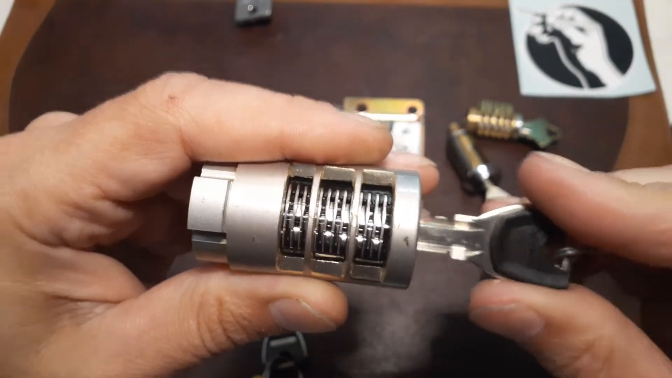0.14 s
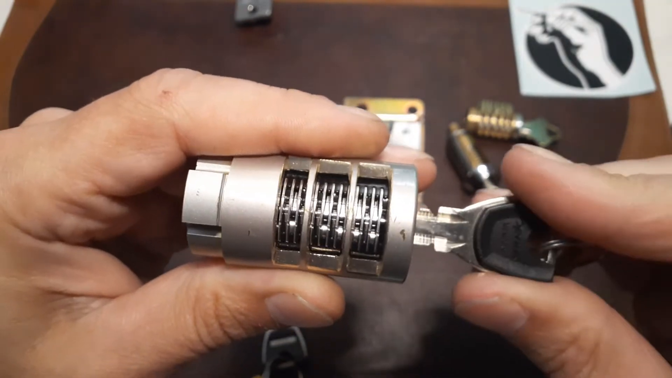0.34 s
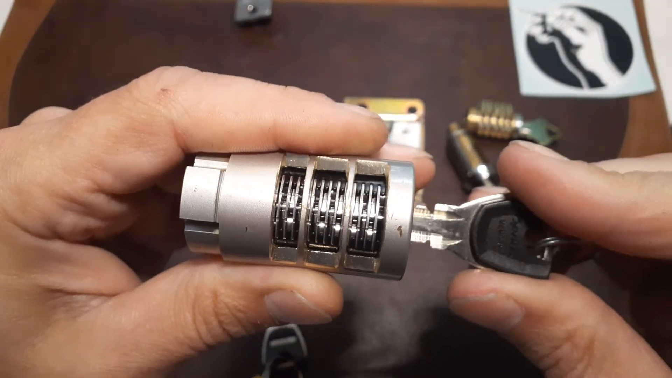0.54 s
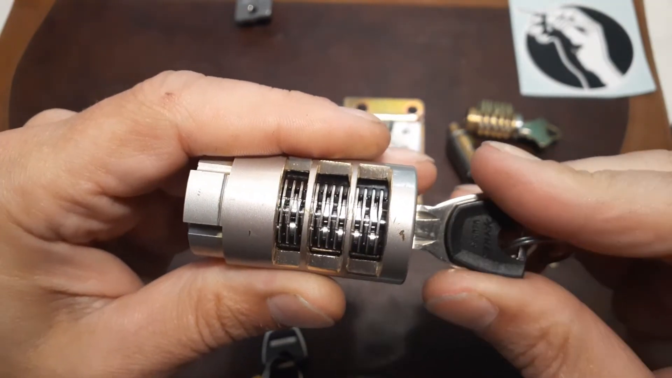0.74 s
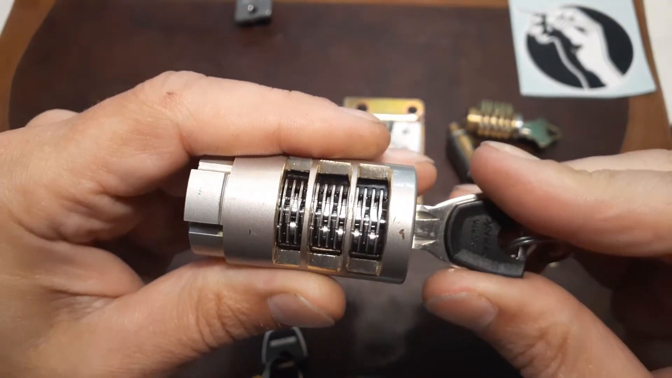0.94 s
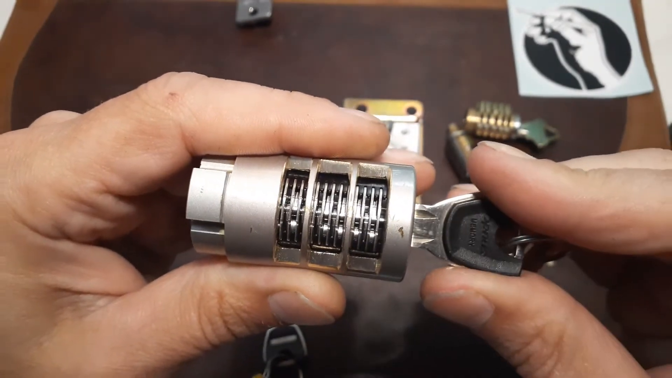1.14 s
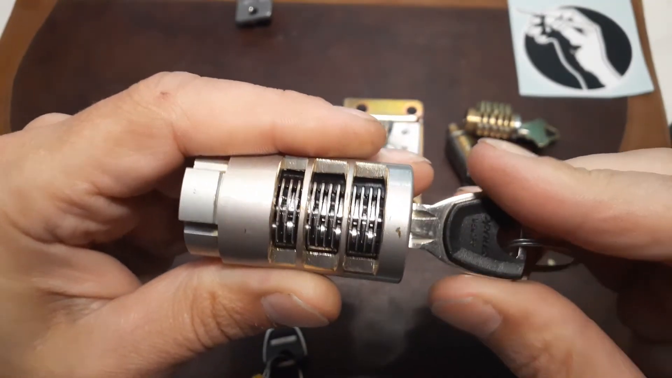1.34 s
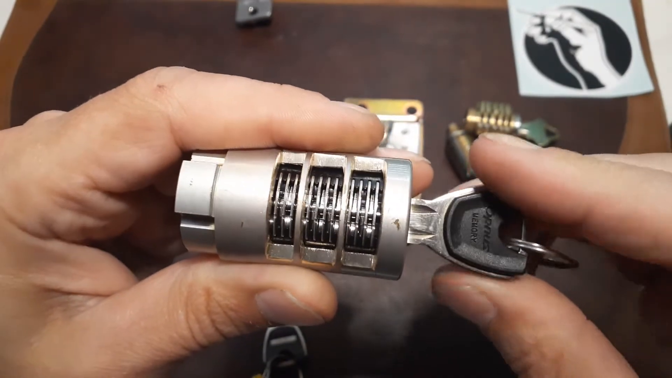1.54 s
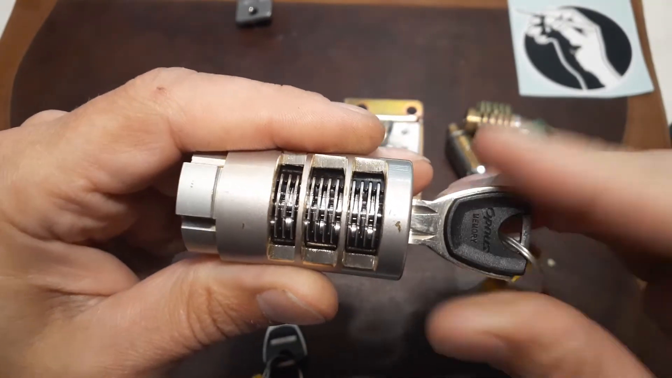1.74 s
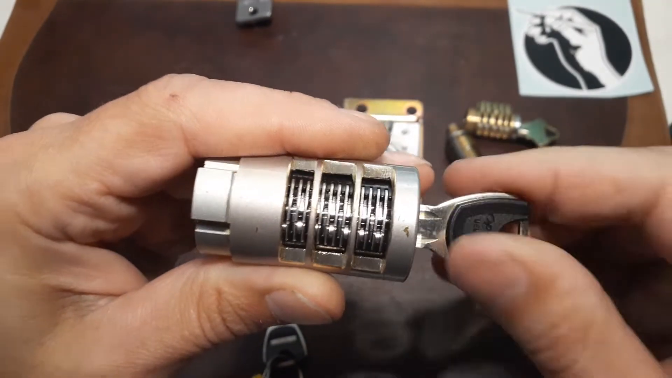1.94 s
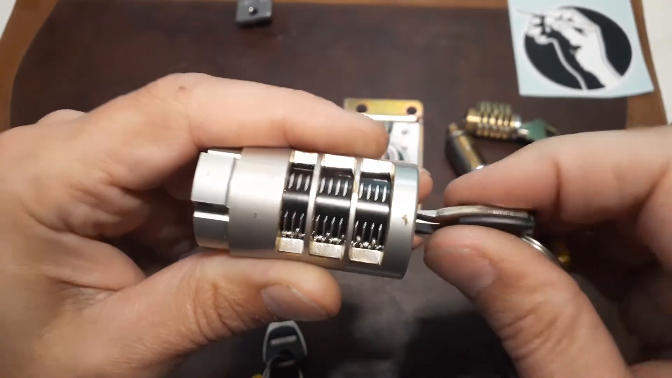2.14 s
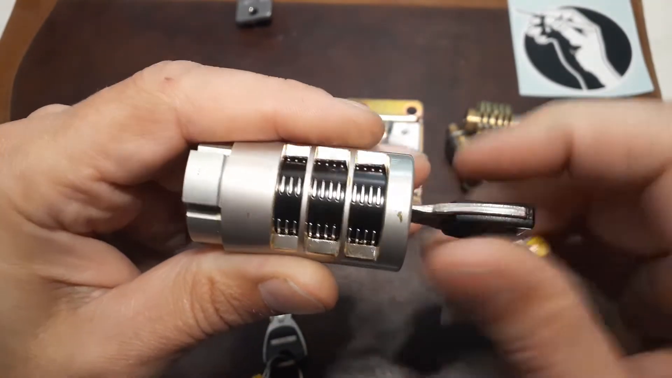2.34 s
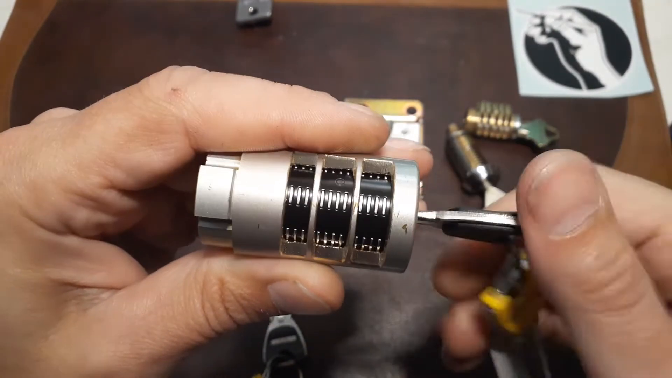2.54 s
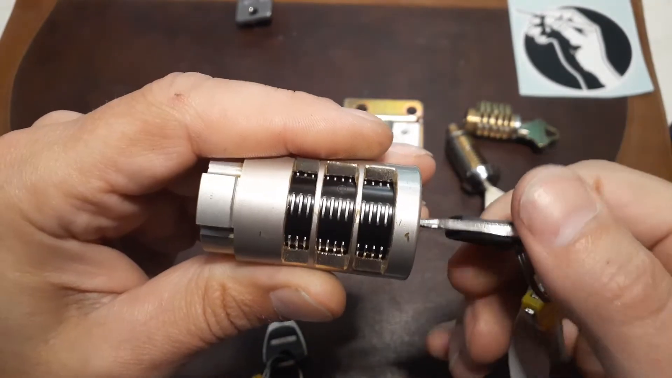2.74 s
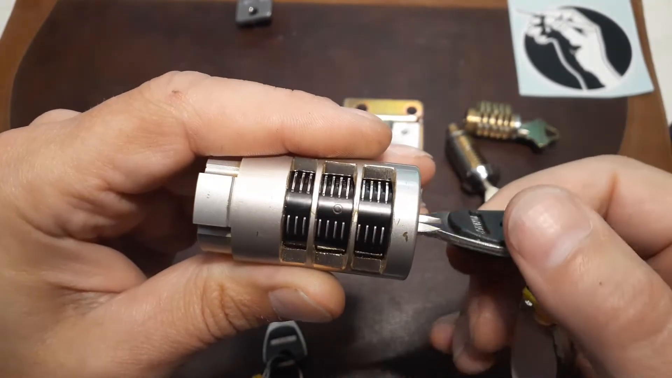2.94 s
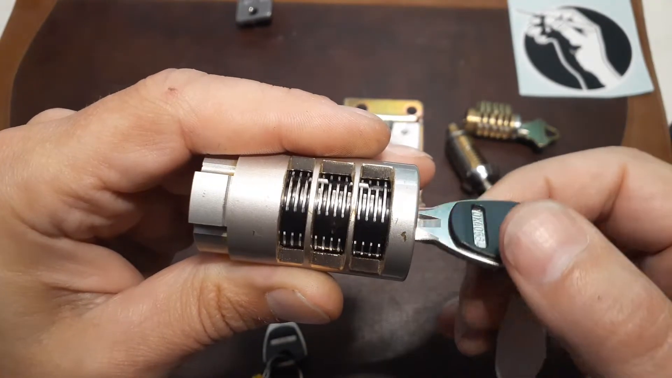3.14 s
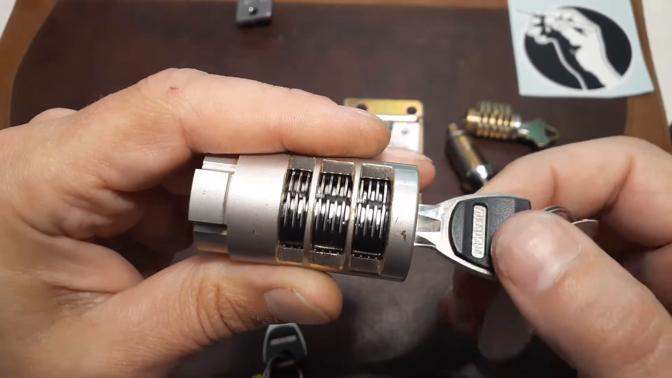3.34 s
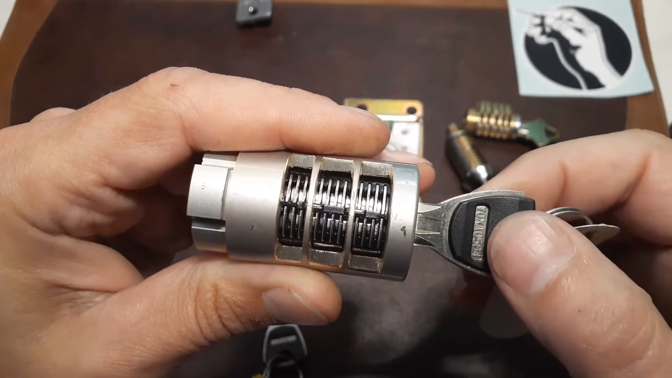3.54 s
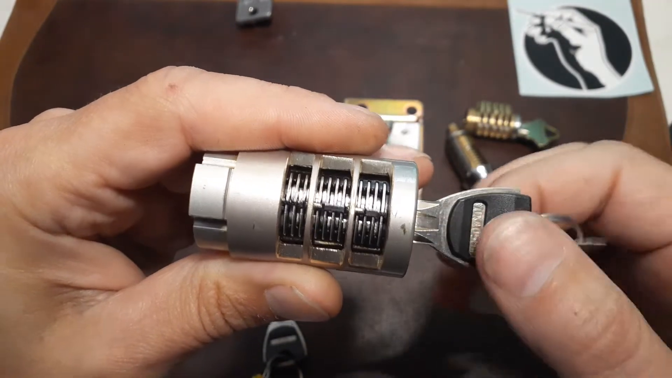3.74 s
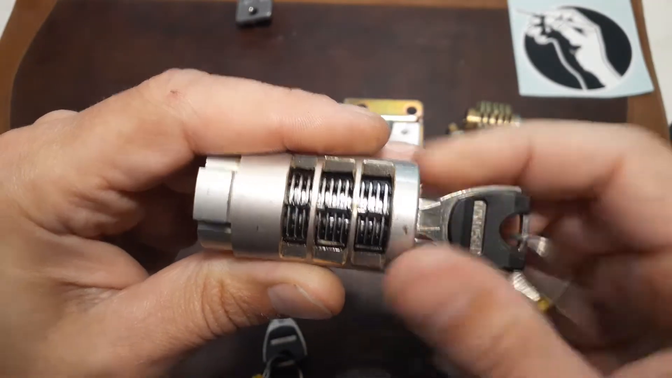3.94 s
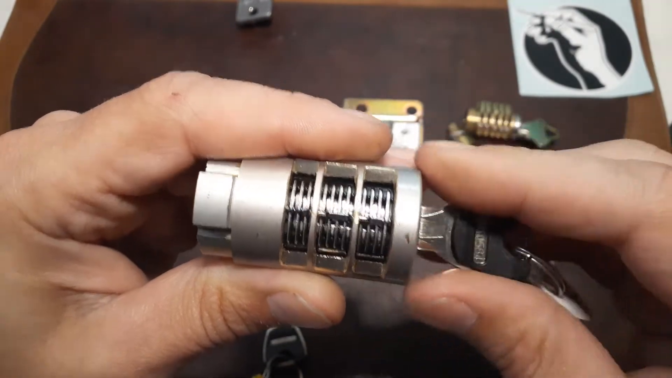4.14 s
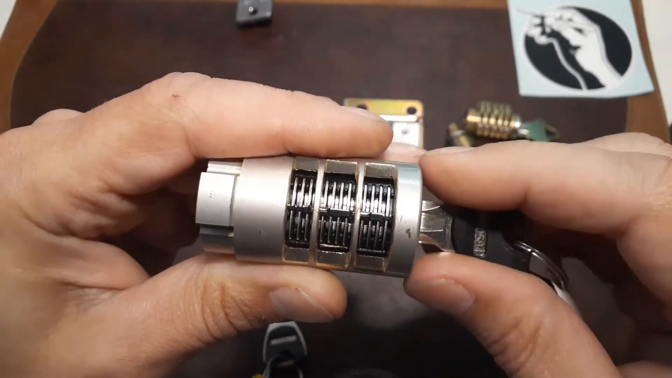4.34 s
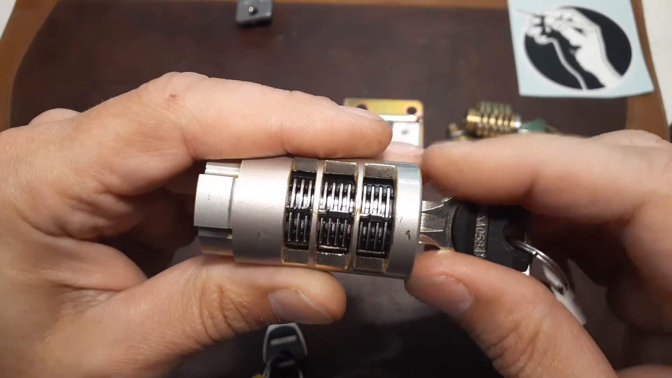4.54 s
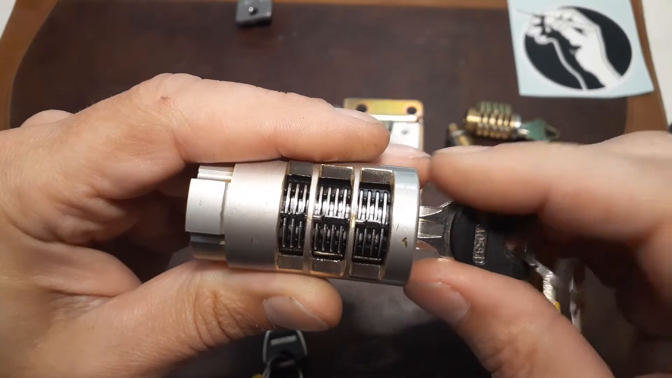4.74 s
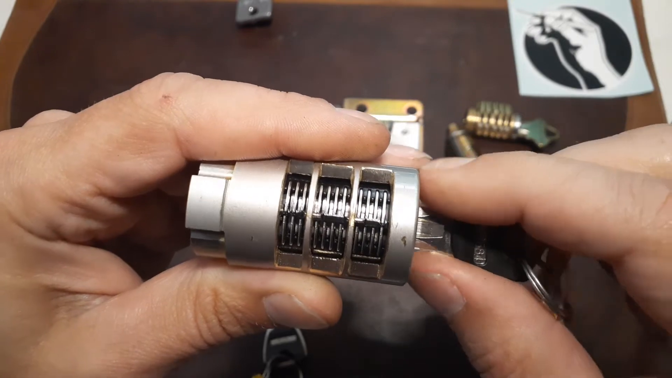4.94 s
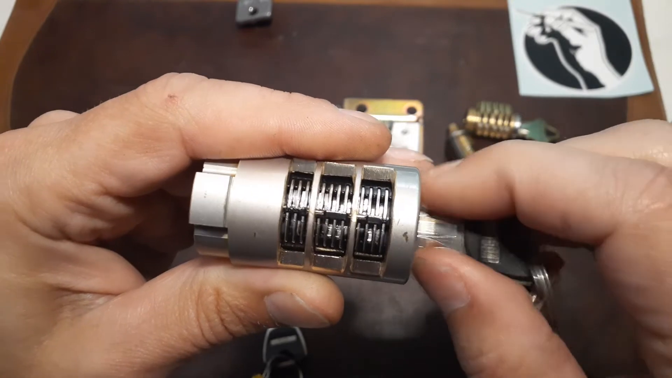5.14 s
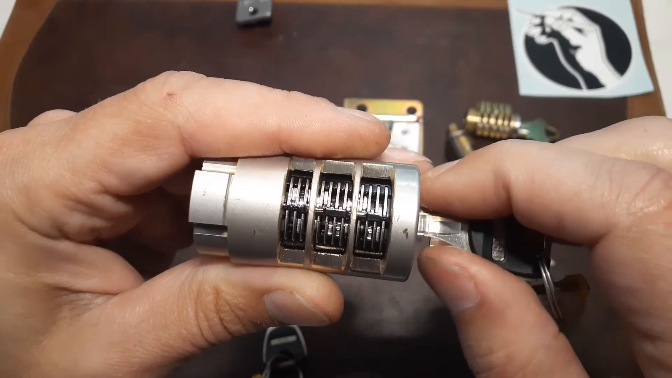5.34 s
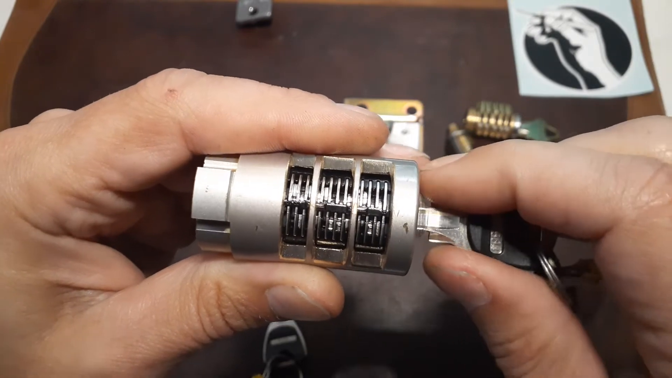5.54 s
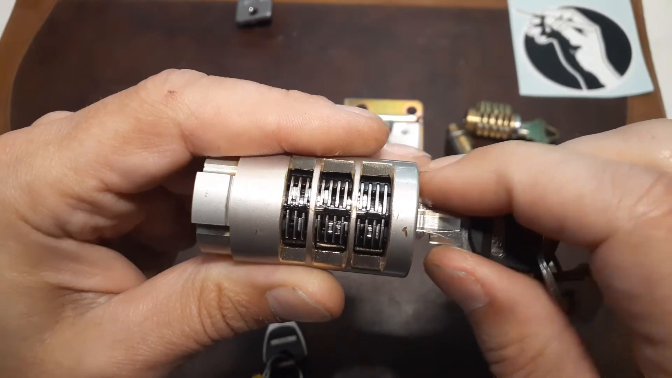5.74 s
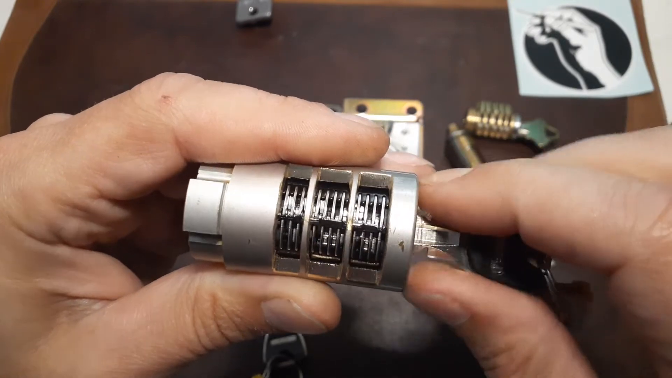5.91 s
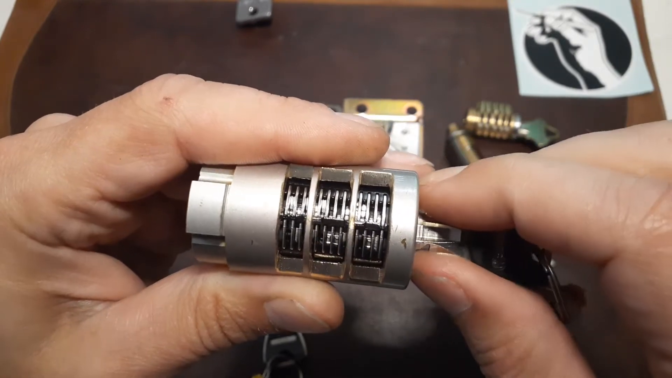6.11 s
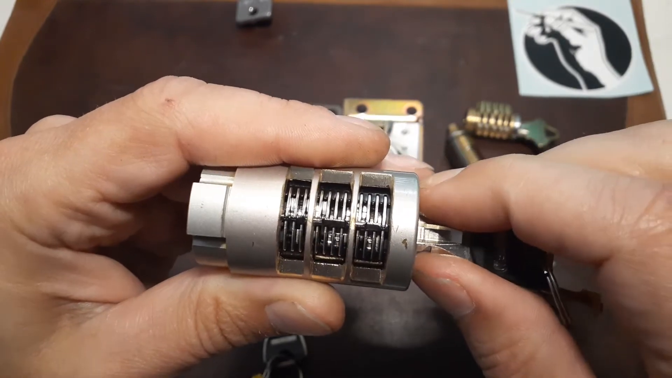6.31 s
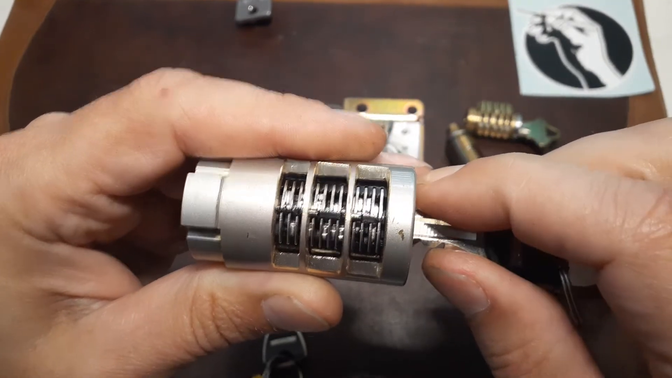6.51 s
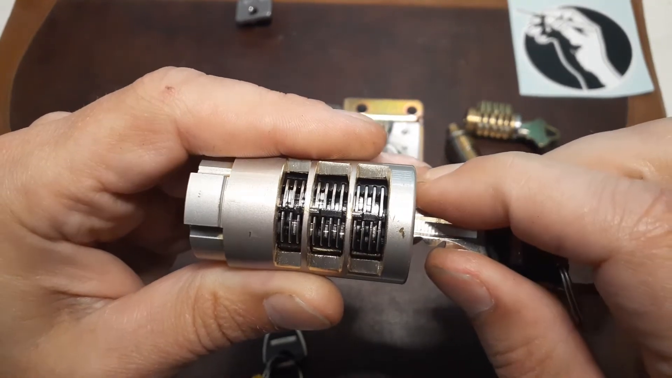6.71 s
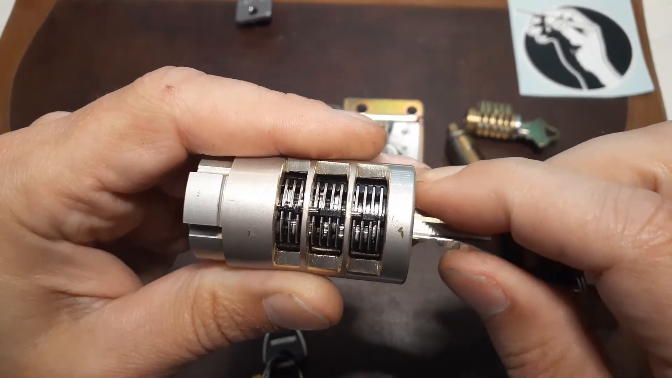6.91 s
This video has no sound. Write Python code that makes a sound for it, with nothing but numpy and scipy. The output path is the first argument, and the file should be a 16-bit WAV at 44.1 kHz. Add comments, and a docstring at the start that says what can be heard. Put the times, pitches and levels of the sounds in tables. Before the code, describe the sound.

Close up in a small room, tiny spring-loaded parts snap and tick as a key slides into a metal lock. Fingers rub faintly on the key as it turns, with a few dull hand bumps and one sharp, ringing click. Short clusters of crisp clicks, with pauses between them, come as the key is eased partway back. The lock sits slightly to the left, and a fan hums softly throughout.

```python
"""A fan hums in a small room as a key on a ring is pushed into a hand-held lock cylinder.
Spring-loaded wafers grind over its cuts and snap against the housing; now and then an impact leaves
a small steel part in free vibration. The key is then turned, while fingers rub on it with stick-slip
friction and the hands bump close by on the left. Last, it is worked part of the way back out."""
import sys
import numpy as np
from scipy import signal
from scipy.fft import rfft, irfft
from scipy.io import wavfile

SR = 44100
rng = np.random.default_rng(int(sys.argv[2]) if len(sys.argv) > 2 else 0)


def dump_mix(stems):
    """Bounce the given channels to the path in sys.argv[1] as a 16-bit WAV at rate SR."""
    frames = np.atleast_2d(stems).T  # one column per channel
    limited = np.clip(frames, -1, 1)  # hard clip at full scale
    pcm = np.round(limited * 32767).astype(np.int16)
    wavfile.write(sys.argv[1], SR, pcm)


N = 307377
TIME = np.arange(N) / SR
CUTOFF_HZ = 16000


def contacts(body_t60=0.038, likeness=0.44, spread_db=1.5, count=300):
    """Modal superposition: each metal contact scrapes in, snaps, and excites the modes of the lock."""
    # metal contacts: (time [s], treble level [dB], body emphasis [dB], slip time before landing [s])
    impacts = [(0.1155, -28.5, -4.5, 0.0021), (0.1329, -36, 0, 0.00064), (0.146, -37, -9, .001),
               (0.153, -20.5, -8, .0006), (0.1595, -40, 3, .001), (.168, -29.5, -2, 0.00049),
               (0.1857, -42, -11, .0005), (0.2116, -26, -4.5, 0.00096), (0.232, -47, 7, 0.00046),
               (0.6107, -49, -5.5, .0004), (0.6225, -26, -8.5, .0016), (0.6322, -30.5, -2, .0005),
               (0.65, -50, 8, .0005), (0.66, -22.5, -4, 0.0051), (0.665, -32.5, -3.5, .0006),
               (1.3106, -76.5, -10.5, 0.00043), (1.3237, -61.5, -7.5, 0.00091),
               (1.6514, -65.5, -6.5, .0005), (1.8207, -61, -0.5, 0.0011), (1.8363, -65.5, -2, .001),
               (1.916, -76, 12, .001), (1.931, -67.5, 8.5, .0008), (2.0274, -37.5, -10.5, 0.0012),
               (2.034, -35, -5.5, .002), (2.076, -55, -6, .002), (2.0886, -41, -20, 0.0008),
               (2.095, -43, 0, 0.0024), (2.773, -67, 13, .003), (2.783, -50, 5.5, .0002),
               (3.433, -37.5, -14, .001), (3.4362, -21, -10.5, 0.00011), (3.4415, -33, -7, .001),
               (3.9893, -65, 13, .0004), (4.047, -67, 0, .0005), (4.081, -77, 19, .001),
               (4.0898, -50.5, 0.5, 0.0011), (4.1464, -62, -11, .001), (4.821, -67.5, 2, .002),
               (4.986, -52.5, -3, .0004), (5.1138, -62, 2, .002), (5.1487, -43.5, -9.5, .0002),
               (5.173, -26.5, -10, .003), (5.179, -39, -2, 0.0012), (5.3378, -66.5, 0.5, 0.0032),
               (5.358, -68, 2, .003), (6.4987, -45.5, -9.5, 0.0013), (6.5133, -23.5, -14, .003),
               (6.8178, -33.5, -12, 0.0021), (6.8233, -25.5, -10, .0003)]
    # spectral envelope of a contact: (frequency [Hz], level [dB])
    lock_colour = [(60, -20), (250, -14.5), (600, -17), (1250, -21.5), (1900, -1), (3100, 3.5), (4300, 2),
                   (5300, -2.5), (6300, -2), (7700, 1), (8600, 8), (10500, 3), (13500, 7.5), (15700, 4)]
    # distinct resonances of key and housing: (frequency [Hz], level [dB], t60 [s])
    lock_modes = [(2280, 3, 0.055), (2700, -2.5, 0.017), (3320, -1.5, 0.096), (3630, 2, 0.05),
                  (4280, -1, 0.0093), (8450, -2, 0.065), (8270, -3, 0.048), (12800, -3.5, 0.047),
                  (13500, 0, 0.067), (14000, 0.5, .06)]
    rise_s, snap_s, half_snap_slip_s = .0003, .001, .00035
    scrape_db, snap_db = -9.5, 14
    crowd_hz = np.linspace(80, CUTOFF_HZ, count) + rng.uniform(-25, 25, count)
    crowd = np.column_stack([crowd_hz, np.zeros(count), np.full(count, body_t60)])
    hz, mode_db, t60 = np.vstack([crowd, lock_modes]).T
    lead, attack = round(.012 * SR), round(.0035 * SR)
    t = TIME[:SR // 8] - lead / SR
    before, after = np.minimum(t, 0), np.maximum(t, 0)
    modes = from_db(-60 * after / t60[:, None]) * np.exp(2j * np.pi * hz[:, None] * t)
    modes = np.vstack([modes.real, modes.imag])
    body_band = at_hz([(600, 0), (1500, 1), (5500, 1), (8000, 0)], hz)
    bright_band = at_hz([(5500, 0), (8000, 1), (10500, 1), (11500, 0)], hz)
    treble = signal.butter(4, 11000, "high", fs=SR, output="sos")
    out = np.zeros((2, N))
    for time_s, level_db, body_db, slip_s in impacts:
        # every touch lands elsewhere, so it excites the modes with different signs
        shared, own = rng.choice([-1, 1], len(modes)), rng.choice([-1, 1], (2, len(modes)))
        excitation = np.sqrt(likeness) * shared + np.sqrt(1 - likeness) * own
        # lighter and fuller contacts ring lower: more near 9 kHz relative to the top treble
        bright_db = -2.5 + .23 * (-24 - level_db) + .22 * body_db
        colour_db = at_hz(lock_colour, hz) + mode_db + bright_band * bright_db + body_band * body_db
        gains = from_db(colour_db + spread_db * rng.standard_normal(len(hz)))
        ringing = (excitation * np.tile(gains, 2)) @ modes
        # friction builds as the part slips; the shorter the slip, the harder the snap
        scrape = from_db(scrape_db) * np.exp(before / slip_s)
        snap = from_db(snap_db) / (1 + (slip_s / half_snap_slip_s) ** 2)
        onset = .5 * (1 + np.tanh(t / rise_s))
        strike = onset * (1 + snap * np.exp(-(t / snap_s) ** 2))
        hit = ringing * (scrape + strike)
        treble_rms = signal.sosfilt(treble, hit[:, lead:lead + attack]).std()
        add(out, time_s + t[0], from_db(level_db) * hit / treble_rms)
    return out


def pings(pan_db=7.5):
    """Free vibration: a lightly damped steel part rings on as a sum of decaying sinusoids."""
    # parts left ringing by a snap: (time [s], part, level [dB])
    struck_parts = [(.153, "spring", -58), (.2115, "spring", -59), (0.661, "spring", -55.5),
                    (0.662, "housing", -53.5), (1.323, "key", -70.5), (2.095, "key", -49.5),
                    (2.785, "housing", -57.5), (2.784, "wafer", -57), (3.4361, "key ring", -41),
                    (4.822, "wafer", -71), (4.986, "wafer", -71), (5.15, "wafer", -66),
                    (5.173, "wafer", -54), (6.514, "housing", -61.5), (6.822, "key", -58.5)]
    # natural modes of each part: (frequency [Hz], level [dB], t60 [s])
    part_modes = {"spring": [(7122, 1.5, 0.46), (7335, -3.5, 0.31)], "key ring": [(4380, -1, 0.36),
                  (2060, -3, .041), (2950, -4, 0.035), (8420, 12, .035)], "key": [(2015, 2, .06),
                  (2280, -4.5, 0.049), (2695, -6.5, 0.031), (4180, -9.5, 0.084)],
                  "wafer": [(2260, -3, 0.074), (3470, -1.5, 0.07), (4000, -5.5, .07)],
                  "housing": [(560, 0, .04), (800, -1.5, 0.013), (1020, 1.5, .041), (1280, -0.5, 0.031),
                  (1572, 5, .04)]}
    out, t = np.zeros((2, N)), TIME[:SR]
    for time_s, part, level_db in struck_parts:
        ring = sum(from_db(db - 60 * t / t60) * np.sin(2 * np.pi * hz * t)
                   for hz, db, t60 in part_modes[part])
        add(out, time_s, panned(pan_db) * from_db(level_db) * ring)
    return out


def rubbing(grain_db=3.5, uneven_db=4.5, width_hz=650.0):
    """Stick-slip friction: skin and metal catch and let go; each stroke excites one key resonance."""
    # strokes of fingers and key:
    # (time [s], length [s], level [dB], body emphasis [dB], resonance [Hz], resonance level [dB])
    strokes = [(1.967, 0.013, -57, -3.5, 9050, -15), (2, .17, -64.5, 2.5, 11800, -12),
               (2.376, .07, -70, -2.5, 9120, -13.5), (2.522, 0.18, -79, -2, 8800, -5.5),
               (2.707, .02, -72.5, 5.5, 7460, 5), (2.745, 0.065, -71.5, 13, 8560, -6),
               (2.904, 0.022, -71, 5.5, 4060, -21), (3.649, 0.034, -68, 10.5, 7300, -12.5),
               (3.887, .055, -85, -10.5, 6550, 1.5), (3.851, 0.16, -83, -20, 8900, 2),
               (3.977, 0.17, -74.5, 12, 11200, -9), (5.88, 0.054, -78, 7, 9500, -7)]
    # friction spectrum: (frequency [Hz], spectral density [dB])
    rub_colour = [(900, -12.5), (1600, -1), (2300, 3.5), (3200, -10), (4200, -1.5), (5300, -9), (7400, 2),
                  (8700, 6), (10500, 2.5), (13000, 3), (15500, 1)]
    catches_per_s, catch_db, catch_decay_s = 40, 3.5, .0032
    out, t = np.zeros((2, N)), TIME[:SR // 2] - .1
    hz = np.fft.rfftfreq(len(t), 1 / SR)
    body_band = at_hz([(4500, 1), (7000, 0)], hz)
    friction = rms_one(from_db(at_hz(rub_colour, hz)))
    impulses = rng.random(N) < catches_per_s / SR
    catches = signal.lfilter([1], [1, -np.exp(-1 / (catch_decay_s * SR))], impulses + 1e-18)
    roughness = from_db(grain_db * drift(460) + uneven_db * drift(44))
    grip = roughness * (1 + from_db(catch_db) * catches)
    grains = rms_one(rng.standard_normal((2, N)) * grip)
    for time_s, length_s, level_db, body_db, peak_hz, peak_db in strokes:
        start = round((time_s + t[0]) * SR)
        resonance = rms_one(np.abs(1 / (1 + 2j * (hz - peak_hz) / width_hz)) ** 2)
        colour = friction * from_db(body_db * body_band) + from_db(peak_db) * resonance
        stroke = grains[:, start:start + len(t)] * swell(t, length_s, rise_s=.014, fall_s=.03)
        add(out, time_s + t[0], from_db(level_db) * irfft(rfft(stroke) * colour, len(t)))
    return out


def bumps(pan_db=52.0, gain_db=-0.5, rumble_db=-15):
    """Heavy damping: a bump of the hands dies in a few cycles, in a longer rumble of shifting skin."""
    # soft impacts: (time [s], level [dB], frequency [Hz])
    thuds = [(1.544, -33.5, 90), (1.656, -48, 55), (4.011, -35, 100), (4.167, -35, 110), (6.882, -62, 50)]
    # spectrum of shifting skin: (frequency [Hz], spectral density [dB])
    skin_colour = [(20, -34), (55, 1.5), (100, -3), (170, -2), (300, -36.5), (700, -74)]
    out, rumble = np.zeros(N), from_db(rumble_db) * coloured(rng.standard_normal(N), skin_colour)
    for time_s, level_db, hz in thuds:
        t = TIME - time_s
        thud = swell(t, 0, rise_s=.0034, fall_s=.012) * np.sin(2 * np.pi * hz * t)
        out += from_db(level_db) * (thud + rumble * swell(t, 0, rise_s=.027, fall_s=.043))
    return from_db(gain_db) * panned(pan_db) * out


def placed(x, lag_s=.00018):
    """Time and level differences: the lock is heard first on the left, and louder, most in the treble."""
    # level difference: (frequency [Hz], left minus right [dB])
    balance = [(500, 3), (2500, 2.5), (8000, 4), (13000, 7)]
    hz = np.fft.rfftfreq(N, 1 / SR)
    gains = from_db(at_hz(balance, hz) * np.array([[.5], [-.5]]))
    delay = np.exp(-2j * np.pi * hz * lag_s * np.array([[0], [1]]))
    return irfft(rfft(x) * delay * gains / np.sqrt(np.mean(gains ** 2, axis=0)), N)


def room(x, wet_db=-16.0, desk_db=-14.0, desk_t60=0.018, bass_db_per_decade=7.5, bands=9):
    """Reverberation: early reflections from hands and desk, then a short tail; both favour the lows."""
    # reverberation time: (frequency [Hz], t60 [s])
    room_t60 = [(200, 0.31), (2000, 0.16), (8000, 0.11), (13000, 0.15)]
    t = TIME[:SR // 2]
    edges = np.geomspace(150, 17000, bands + 1)
    white, response = rng.standard_normal((bands, 2, len(t))), 0
    for noise, low, high in zip(white, edges, edges[1:]):
        hz = np.sqrt(low * high)
        tail = rms_one(from_db(-60 * t / at_hz(room_t60, hz)) * (t > .008))
        early = rms_one(from_db(-60 * t / desk_t60) * (t > .003))
        decay = np.hypot(from_db(wet_db) * tail, from_db(desk_db) * early) / np.sqrt(len(t))
        band = signal.sosfilt(signal.butter(2, [low, high], "band", fs=SR, output="sos"), noise * decay)
        response = response + band * from_db(bass_db_per_decade * np.log10(edges[-1] / hz))
    return signal.fftconvolve(x, response, axes=1)[:, :N]


def fan(air_db=-64.5, air_pan_db=1.5, wander_rad=0.25, lag_s=.00045):
    """Broadband and tonal noise: dull rushing air and a wavering hum reach the right side first."""
    # spectrum of fan and room air: (frequency [Hz], spectral density [dB])
    air_colour = [(18, -73), (30, -35), (90, -21.5), (112, -24), (221, -14.5), (259, -9.5), (280, -9.5),
                  (526, -17.5), (780, -21), (844, -25), (1130, -33), (2290, -37.5), (6900, -51),
                  (14800, -39), (16000, -44.5)]
    # coherence of the air noise: (frequency [Hz], left-right correlation)
    air_coherence = [(40, .2), (130, 0.84), (260, 1), (500, 0), (1000, 0.61), (15000, 0.24)]
    # slow wavering of the rush: (time [s], level [dB])
    air_swell = [(0, 2), (.5, -1.5), (.9, -2.5), (1.7, -1.5), (2.3, 0.5), (4.6, 0.5), (6.97, 0)]
    # tones of the fan: (frequency [Hz], rms level [dB])
    tones = [(119.5, -79.5), (258, -65), (515.5, -72), (839.5, -77), (2320, -92.5), (9001, -103)]
    alike = at_hz(air_coherence, np.fft.rfftfreq(N, 1 / SR))
    mid, side = rfft(rng.standard_normal((2, N)))
    air = irfft(np.sqrt(1 + alike) * mid + np.sqrt(1 - alike) * side * [[1], [-1]], N)
    hum = sum(from_db(db) * np.sqrt(2) * np.sin(2 * np.pi * hz * TIME + wander_rad * drift(16))
              for hz, db in tones)
    air_gain = from_db(air_db + np.interp(TIME, *np.transpose(air_swell)))
    left, right = air_gain * panned(air_pan_db) * coloured(air, air_colour) + hum
    return np.array([np.interp(TIME - lag_s, TIME, left), right])


def whine(hz=14686, level_db=-90):
    """Phase modulation: a thin electronic tone wanders slightly, alike in both channels."""
    return from_db(level_db) * np.sqrt(2) * np.sin(2 * np.pi * hz * TIME + drift(25))


def from_db(db):
    """Decibels to amplitude ratio."""
    return 10 ** (np.asarray(db) / 20)


def rms_one(x):
    """Normalisation to unit rms."""
    return x / np.sqrt(np.mean(x ** 2) + 1e-20)


def at_hz(points, hz):
    """Interpolation of a table on a log-frequency axis."""
    table = np.array(points)
    return np.interp(np.log(np.maximum(hz, 1)), np.log(table[:, 0]), table[:, 1])


def panned(pan_db):
    """Constant-power panning: left and right gains, pan_db apart."""
    return rms_one(from_db([[pan_db / 2], [-pan_db / 2]]))


def add(out, start_s, sound):
    """Superposition: mix a sound in at its moment."""
    i = max(round(start_s * SR), 0)
    out[:, i:i + sound.shape[-1]] += sound[..., :N - i]


def drift(per_s):
    """Random modulation: straight lines between Gaussian values."""
    knots = rng.standard_normal(4000)
    return np.interp(TIME * per_s, np.arange(len(knots)), knots)


def coloured(x, spectrum):
    """Spectral shaping of a steady noise, at unit rms."""
    hz = np.fft.rfftfreq(N, 1 / SR)
    return rms_one(irfft(rfft(x) * from_db(at_hz(spectrum, hz)), N))


def swell(t, length_s, rise_s, fall_s):
    """Exponential envelope: grows up to time 0, holds, and decays."""
    return np.exp(np.minimum(t, 0) / rise_s - np.maximum(t - length_s, 0) / fall_s)


def scene():
    """Superposition of the nearby lock, its reflections, the hands and the background."""
    lock = placed(contacts() + rubbing())
    return lock + room(lock) + pings() + bumps() + fan() + whine()


def record(dry):
    """Band limiting: an elliptic low-pass cuts the top steeply."""
    return signal.sosfilt(signal.ellip(10, .2, 80, CUTOFF_HZ, fs=SR, output="sos"), dry)


dry = scene()
out = record(dry)
dump_mix(out)
```